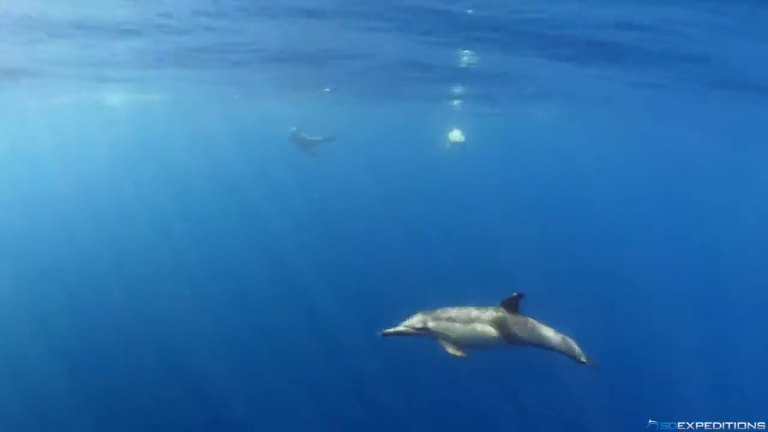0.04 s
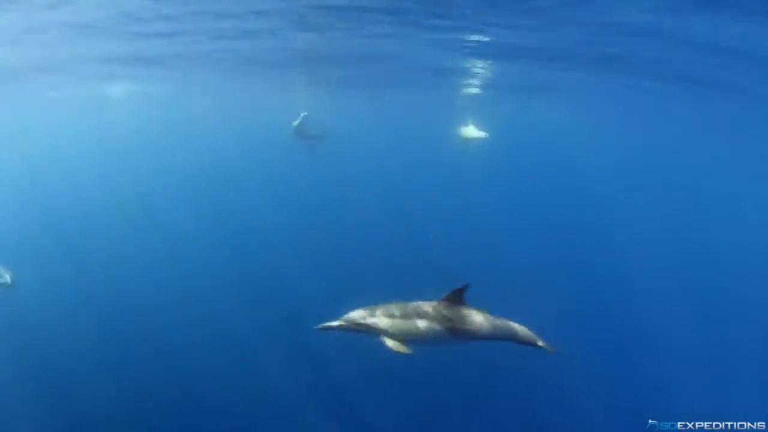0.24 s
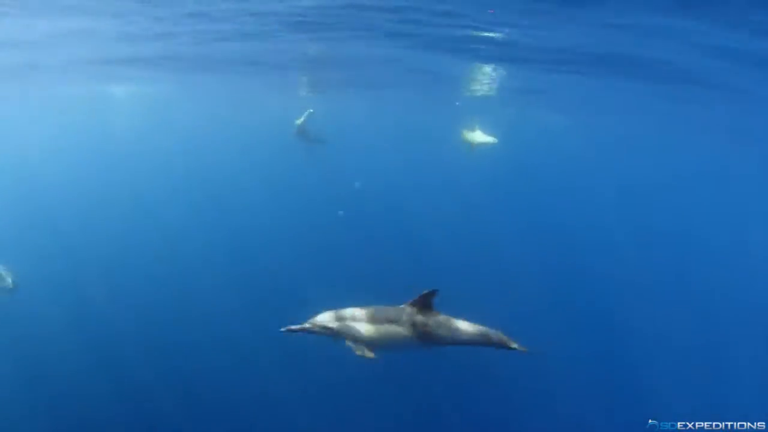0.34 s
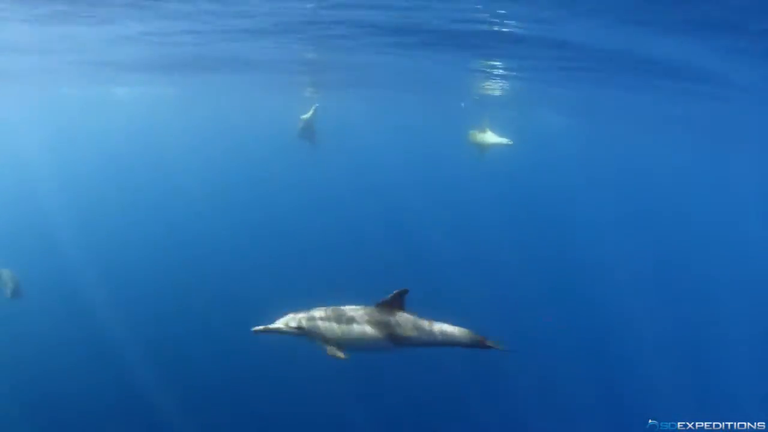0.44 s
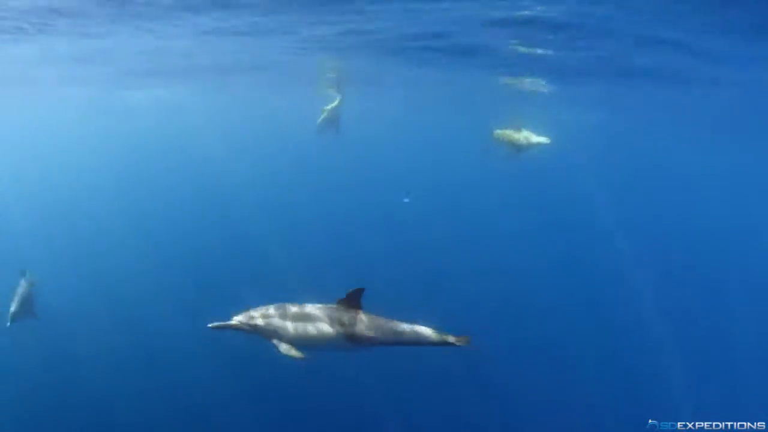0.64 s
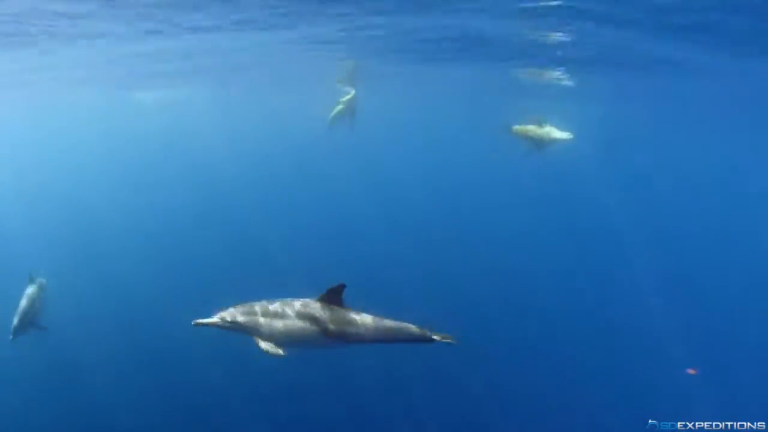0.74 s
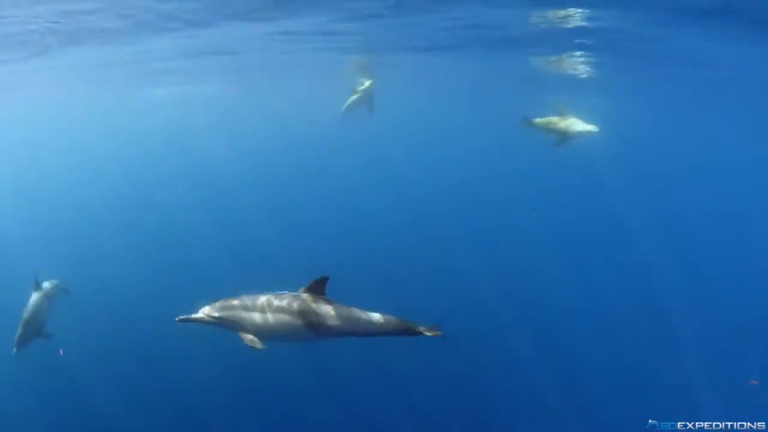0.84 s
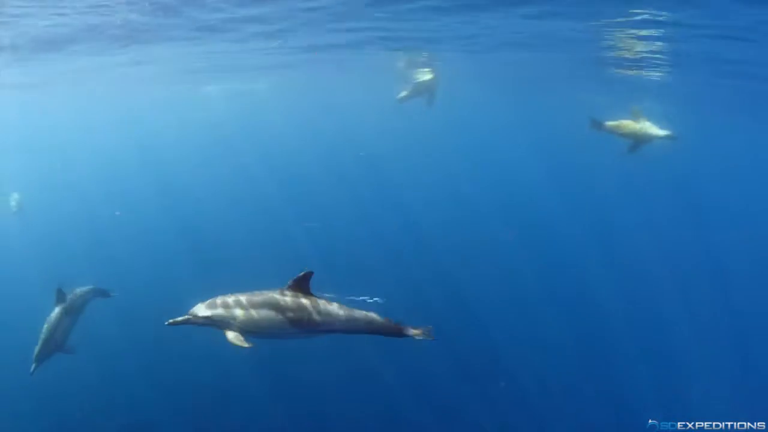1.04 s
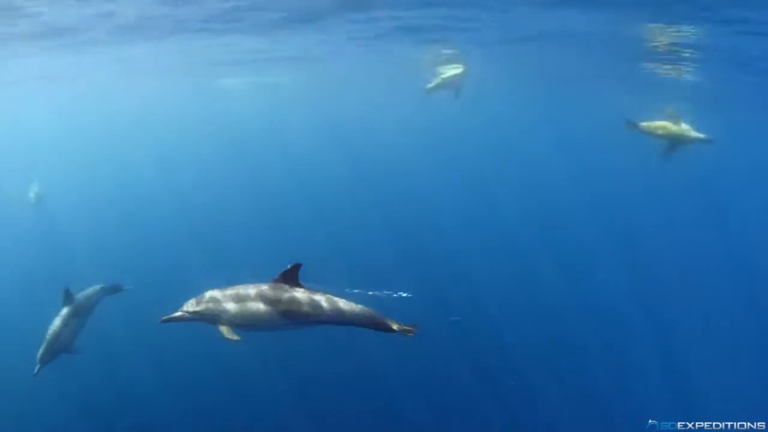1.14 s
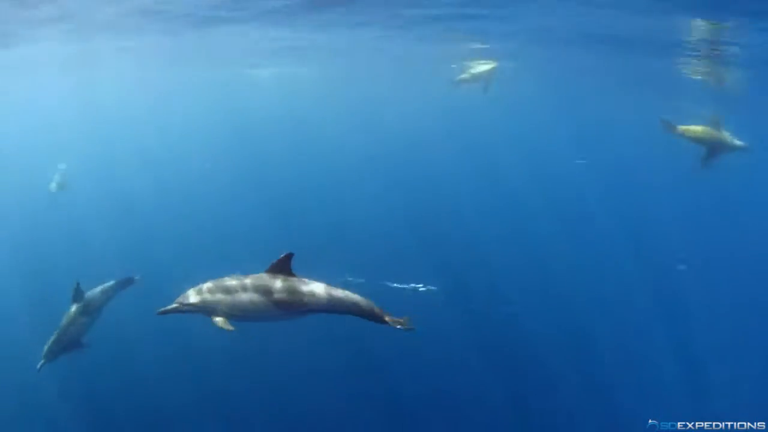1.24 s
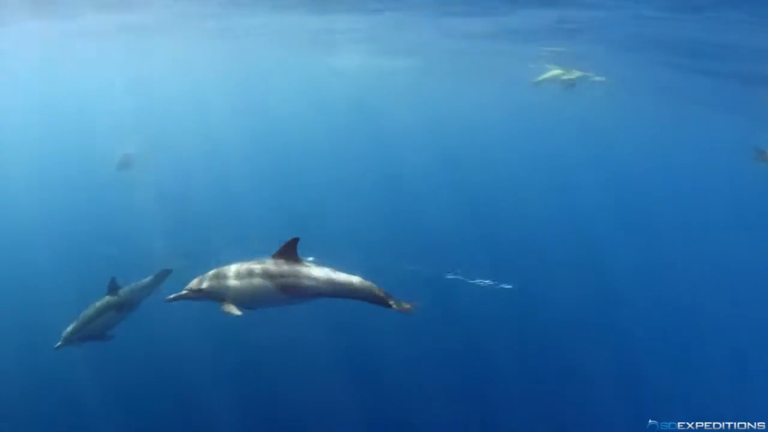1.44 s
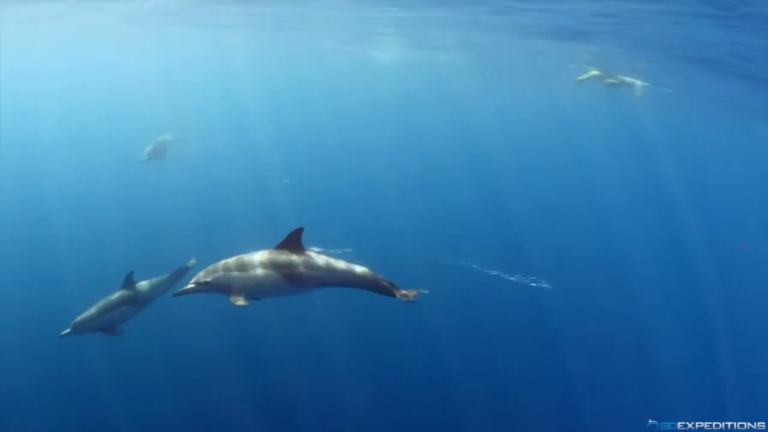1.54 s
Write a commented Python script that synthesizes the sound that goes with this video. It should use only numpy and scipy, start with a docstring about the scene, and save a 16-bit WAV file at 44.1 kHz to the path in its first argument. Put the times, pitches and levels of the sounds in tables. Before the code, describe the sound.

Dolphins click in rapid trains underwater in the open sea. Early on, a gush of bubbles gurgles and fizzes close to the microphone. Two high rising whistles follow, then slower knocking clicks, over steady low sea noise.

```python
"""Bubbles and dolphins in open sea

Underwater, two microphones inside a camera housing, whose air rings with churn and knocks. Close by, a gush of
bubbles gurgles and fizzes; single bubbles ping and small snaps crack. Out in the water two dolphins click in
trains, a nearer one knocks slowly, and two whistles rise, the first led in by a few snaps, smeared by scatter
off the surface. Steady sea noise lies behind it all."""
import sys
import numpy as np
from scipy import signal
from scipy.io import wavfile
from scipy.ndimage import uniform_filter1d

SR = 44100
rng = np.random.default_rng(int(sys.argv[2]) if len(sys.argv) > 2 else 0)


def materialize(psi):
    """Save the field psi as 16-bit PCM at rate SR to the path in sys.argv[1].

    A 1-D psi becomes a single channel; in a 2-D psi each row is a channel.
    """
    bounded = np.clip(np.atleast_2d(psi).T, -1, 1)
    quanta = np.round(bounded * 32767).astype(np.int16)
    wavfile.write(sys.argv[1], SR, quanta)


N = 70560

# Churn of the water close by: time_s, level_db
CHURN_LEVELS = [(0, -72), (.21, -68), (.232, -45), (.3, -47.5), (.43, -54.5), (.55, -54), (.63, -58),
                (.7, -60), (.8, -64), (.95, -66.5), (1.28, -65.5), (1.33, -61), (1.6, -67)]
GURGLE_DB, GURGLE_PER_S = 31, 900
# Air modes of the housing: pitch_hz, width_hz, churn_db, knock_db, stereo_turn_rad
AIR_MODES = [(346.2, 141, -5, -34, 0.11), (412, 97, 0, -1.5, -0.069), (636.7, 102, -12, 0.5, -0.16),
             (682, 107, -19, -4, 0.026), (853, 69, -9.5, -24, 0.78), (1037.4, 53, -20.5, 2.5, -0.39),
             (1416, 42.3, -24.5, 2.5, -0.43), (1780, 106, -53, 6, 1.25), (2040, 42, -58, -1, -0.58),
             (2340, 185, -47, -5, 1.07), (2807, 53, -31.5, -42, -0.53)]
# Big bubbles of the gush: peak_s, level_db, pitch_hz, length_s
BIG_BUBBLES = [(.228, -30.5, 399.6, 0.019), (0.251, -44, 406, 0.015), (0.264, -29.5, 321, 0.018),
               (.281, -23.5, 360.4, 0.023), (0.301, -34, 447, 0.038), (0.341, -28.5, 375, 0.026),
               (0.367, -26, 395.6, 0.0216), (0.396, -34, 382, 0.031), (.422, -33.5, 380, 0.03),
               (0.445, -34, 420, 0.013), (0.455, -32.5, 396, 0.0145), (0.469, -27.5, 394, 0.0158),
               (0.503, -36, 405.4, 0.046), (0.536, -40.5, 421, 0.047), (0.567, -39.5, 420, 0.025),
               (0.607, -41, 389, 0.048), (0.652, -38, 421, 0.055), (0.676, -38.5, 395, 0.021),
               (0.721, -42, 384, 0.028), (0.774, -43, 362, 0.027), (1.332, -41, 383, 0.016),
               (1.414, -45, 402, 0.022)]
GULP_GLIDE, GULP_TURN = 0.13, -0.075  # share of pitch climbed; lean to the right microphone
# Fizz of the gush: time_s, level_db
FIZZ_LEVELS = [(0, -71.5), (0.209, -68.5), (.245, -54.5), (.3, -56.5), (.35, -64), (.46, -65.5), (.56, -73),
               (1.6, -106)]
# Cracks within the fizz: start_s, level_db
FIZZ_CRACKS = [(.2545, -38), (.2735, -41)]
# Resonances of the housing's port: centre_hz, width_hz, gain_db
PORT_MODES = [(3430, 250, -15.5), (5300, 1140, -9.5), (6540, 500, -4.5), (8500, 510, -6), (10800, 660, -1),
              (13300, 3000, -3)]
CRACK_T60_S, FIZZ_PER_S = .012, 9000

# Sonar clicks of two dolphins: start_s, level_db
SONAR_CLICKS = [(0.0084, -53.5), (0.037, -48.5), (0.0545, -44.5), (0.0833, -51), (0.1045, -52),
                (0.1266, -45), (0.15, -53), (0.1715, -51), (0.194, -52.5), (0.2159, -49.5), (0.2375, -52),
                (0.259, -54), (0.282, -48), (0.302, -46), (0.322, -47), (0.3433, -48), (0.3636, -49),
                (0.3842, -50), (0.407, -49), (0.4286, -49), (0.452, -48), (0.4805, -49), (0.517, -49),
                (0.653, -54.5), (0.817, -52), (0.852, -49), (0.8886, -48.5), (0.921, -50), (0.9507, -47),
                (0.9846, -47), (1.0163, -47), (1.046, -46), (1.0748, -50.5), (1.1014, -48), (1.1278, -48),
                (1.1383, -54), (1.1544, -52), (1.181, -45), (1.2093, -44), (1.233, -46), (1.2587, -55),
                (1.284, -45), (1.3116, -44.5), (1.3389, -45), (1.3982, -45.5), (1.4315, -46), (1.4714, -48)]
# Spectrum of a click: frequency_hz, level_db
CLICK_SPECTRUM = [(5000, -32), (8000, -34), (10000, -1.5), (12500, 3), (14500, 0), (16000, 7)]
CLICK_DB, CLICK_RISE_S, CLICK_T60_S = -3.5, 0.00069, 0.01
CLICK_TAIL_DB, CLICK_TAIL_T60_S = -11.5, 0.027
# Slow knocks of the near dolphin: start_s, tick_db, housing_db
NEAR_KNOCKS = [(1.2088, -64, -59), (1.2907, -48, -62.5), (1.3229, -49, -59), (1.3645, -42, -54),
               (1.4116, -44.5, -53.5), (1.4619, -45, -50.5), (1.5245, -45.5, -51.5), (1.5852, -46.5, -51.5)]
# Spectrum of a knock's tick: frequency_hz, level_db
TICK_SPECTRUM = [(4500, -14), (6500, 5.5), (9500, 7), (11500, 15.5), (14000, 6), (16000, 3)]
TICK_DB, TICK_T60_S = -5, 0.024
KNOCK_BODY_DB, KNOCK_BODY_T60_S, KNOCK_WIDEN, KNOCK_BLOW = 13.5, 0.06, 3, 13.9
# Whistle contours, one list each: time_s, pitch_hz, level_db
WHISTLE_CONTOURS = [
    [(.731, 10250, -66.5), (.742, 10600, -60), (.75, 10950, -55), (.76, 11030, -56), (.795, 14200, -46.5),
     (.802, 14300, -60), (.811, 15170, -53), (.818, 15000, -73)],
    [(1.156, 8200, -61), (1.168, 8380, -58), (1.184, 8440, -47.5), (1.198, 8740, -45), (1.228, 9720, -53),
     (1.247, 10070, -55), (1.257, 11300, -54.5), (1.265, 13000, -60), (1.272, 14200, -74)],
]
# Place of each whistle: left_over_right_db
WHISTLE_SIDES = [.5, 3]
# Breathy spread around each whistle: level_db
WHISTLE_BREATH = [-13.5, -24]
WHISTLE_WOBBLE_HZ, WHISTLE_FLUTTER_DB, BREATH_HZ = 153, 2, 1580
SCATTER_DB, SCATTER_T60_S = -0.5, 0.021
# Rasp under each whistle: start_s, length_s, level_db, fade_db
WHISTLE_RASPS = [(0.704, 0.067, -65, -16), (1.136, 0.137, -57.5, -8)]
# Spectrum of a rasp: frequency_hz, level_db
RASP_SPECTRUM = [(1000, 0.5), (3300, -6), (4500, -19), (7500, -9), (9500, -3), (12300, -1.5), (14500, -3),
                 (16000, -12)]
RASP_EDGE_S = 0.0031

# Single bubbles: start_s, level_db, pitch_hz, t60_s
LONE_BUBBLES = [(.09, -47, 678, 0.1), (0.085, -45.5, 364, 0.023), (0.272, -48.5, 98, 0.11),
                (0.264, -43, 182, 0.033), (.506, -47, 206, 0.1), (0.91, -53.5, 1007, 0.1),
                (0.998, -59.5, 2660, 0.053), (1.048, -53, 1464, 0.047), (1.142, -62, 1280, 0.25),
                (1.2075, -47.5, 990, 0.03)]
PING_RISE_CYCLES = 3.12
# Small snaps: start_s, level_db, centre_hz; the two near 0.71 s lead into the first whistle
SMALL_SNAPS = [(0.094, -52.5, 5860), (0.111, -49.5, 6550), (0.108, -49, 11100), (.124, -44, 5680),
               (.706, -58, 6800), (.721, -51.5, 9300), (1.001, -47, 6980), (1.026, -34.5, 10470),
               (1.142, -38, 10840), (1.15, -35, 12400)]
SNAP_T60_S, SNAP_WIDTH, SNAP_RING_DB = 0.018, 0.099, -5.5
# Spectrum of the open sea: frequency_hz, level_db
SEA_SPECTRUM = [(15, -62), (25, -23), (285, -7), (384, -9.5), (516, -39), (659, -2), (775, -19.5),
                (1020, -14.5), (1190, -24.5), (2760, -29.5), (3720, -34.5), (12500, -31), (16000, -47)]
# Likeness of noise at the two microphones: frequency_hz, correlation
MIC_LIKENESS = [(30, 0.79), (80, 0.84), (300, 0.99), (700, -0.29), (2500, -0.54), (5000, 0.2),
                (15000, 0.55)]
SEA_DB, CUTOFF_HZ = -61, 16500


def gurgle():
    """Close by, churning water drives the housing with dense, uneven pops."""
    level = amp(np.interp(np.arange(N) / SR, *np.transpose(CHURN_LEVELS)) + GURGLE_DB)
    return housing(level * pops(GURGLE_PER_S, spread_db=2.5))


def gulps():
    """Big bubbles swell out of the gush, each climbing in pitch as it rings."""
    out = 0
    for s, db, hz, length in BIG_BUBBLES:
        t = np.arange(N) / SR - s
        swell = np.cos(np.pi * np.clip(t / length, -.5, .5))
        phase = 2 * np.pi * hz * t * (1 + GULP_GLIDE * t / length / 2)
        out = out + amp(db) * swell * np.sin(phase)
    return out * (1 + GULP_TURN * np.array([[1], [-1]]))


def fizz():
    """Tiny pops, loudest at the gush and bunched into cracks, ring in the port."""
    level = amp(np.interp(np.arange(N) / SR, *np.transpose(FIZZ_LEVELS)))
    level += dying(*np.transpose(FIZZ_CRACKS), CRACK_T60_S)
    shared, *each_mic = [pops(FIZZ_PER_S, spread_db=5.0) for _ in range(3)]
    spit = level * (shared + 0.58 * np.array(each_mic))
    return sum(amp(db) * np.sqrt(SR / width / 20) * bandpass(spit, hz - width / 2, hz + width / 2)
               for hz, width, db in PORT_MODES)


def clicks():
    """Dolphin sonar: each click is a bright burst with a quick rise and a faint scattered tail."""
    s, db = np.transpose(SONAR_CLICKS)
    burst = dying(s, db + CLICK_DB, CLICK_T60_S)
    tail = dying(s, db + CLICK_DB + CLICK_TAIL_DB, CLICK_TAIL_T60_S)
    pole = np.exp(-1 / (CLICK_RISE_S * SR))
    return signal.lfilter([1 - pole], [1, -pole], burst + tail) * noise(CLICK_SPECTRUM)


def knocks():
    """The near dolphin's broader clicks shake the housing: one blow, then a short rattle."""
    s, tick_db, body_db = np.transpose(NEAR_KNOCKS)
    drive = rng.standard_normal(N)
    drive[(s * SR).astype(int)] = KNOCK_BLOW
    shake = dying(s, body_db + KNOCK_BODY_DB, KNOCK_BODY_T60_S) * drive
    tick = dying(s, tick_db + TICK_DB, TICK_T60_S) * noise(TICK_SPECTRUM)
    return tick + housing(shake, knocked=True)


def whistles():
    """Dolphin whistles glide up and waver, smeared by scatter off the rippled surface."""
    direct, t = 0, np.arange(N) / SR
    for contour, side_db, breath_db in zip(WHISTLE_CONTOURS, WHISTLE_SIDES, WHISTLE_BREATH):
        s, hz, db = np.transpose(contour)
        pitch_hz = np.interp(t, s, hz) + WHISTLE_WOBBLE_HZ * drift(155)
        level_db = np.interp(t, s, db, -200, -200) + WHISTLE_FLUTTER_DB * drift(160)
        tone = np.sqrt(2) * amp(level_db) * np.sin(2 * np.pi * np.cumsum(pitch_hz) / SR)
        breath = 1 + amp(breath_db) * drift(BREATH_HZ)
        direct = direct + tone * breath * amp([[side_db / 2], [-side_db / 2]])
    tail = rng.standard_normal((3, SR // 10)) * amp(-60 * t[:SR // 10] / SCATTER_T60_S)
    tail = tail[0] + 2.2 * tail[1:]  # a shared part, plus one for each microphone
    tail /= np.sqrt(np.sum(tail ** 2) / 2)
    return direct + amp(SCATTER_DB) * signal.fftconvolve(direct, tail, axes=1)[:, :N]


def rasps():
    """A grainy rasp fades under each whistle."""
    level, t = 0, np.arange(N) / SR
    for s, length, db, fade_db in WHISTLE_RASPS:
        gate = np.clip(np.minimum(t - s, s + length - t) / RASP_EDGE_S, 0, 1)
        level = level + gate * amp(db + fade_db * (t - s) / length)
    return level * noise(RASP_SPECTRUM, flicker_db=3.0)


def ping(s, db, hz, t60):
    """A lone bubble rings on its own pitch: a sine that swells and dies."""
    t = np.maximum(np.arange(N) / SR - s, 0)
    rise_s = PING_RISE_CYCLES / hz
    swell = np.sin(np.pi / 2 * np.minimum(t / rise_s, 1)) ** 2
    decay = amp(-60 * np.maximum(t - rise_s, 0) / t60)
    return amp(db) * swell * decay * np.sin(2 * np.pi * hz * t)


def snaps():
    """Each small snap is a short ring inside a narrow crack of noise."""
    out, white = 0, rng.standard_normal(N) + 1.4 * rng.standard_normal((2, N))
    for s, db, hz in SMALL_SNAPS:
        hiss = rms_one(bandpass(white, hz * (1 - SNAP_WIDTH), hz * (1 + SNAP_WIDTH)))
        level = uniform_filter1d(dying([s], db - 8.5, SNAP_T60_S), size=40)
        out = out + level * hiss + ping(s, db + SNAP_RING_DB, hz, SNAP_T60_S)
    return out


def housing(drive, knocked=False):
    """The housing's air rings in steep modes; each has its own gain and sign at each microphone."""
    out = 0
    for k, (hz, width, churn_db, knock_db, turn) in enumerate(AIR_MODES):
        r = np.exp(-np.pi * width * (KNOCK_WIDEN if knocked else 1) / SR)
        resonator = [(1 - r * r) / 2, 0, (r * r - 1) / 2, 1, -2 * r * np.cos(2 * np.pi * hz / SR), r * r]
        mode = amp(knock_db if knocked else churn_db) * signal.sosfilt([resonator, resonator], drive)
        mic_gains = np.cos(turn) + np.sin(turn) * np.array([[1], [-1]])
        out = out + (-1) ** k * mode * mic_gains
    return out


def sea():
    """The open sea all around: a steady, low wash."""
    return amp(SEA_DB) * noise(SEA_SPECTRUM)


def noise(spectrum, flicker_db=0):
    """Third-octave bands of stereo noise, each with its own level, flicker and likeness; rms 1."""
    def at(table, hz):
        table_hz, values = np.transpose(table)
        return np.interp(np.log(hz), np.log(table_hz), values)

    bottom, top = spectrum[0][0], spectrum[-1][0]
    edges = np.geomspace(bottom, top, 2 + int(3 * np.log2(top / bottom)))
    out, white = 0, rng.standard_normal((2, 2, N + SR // 8))
    for k, (low, high) in enumerate(zip(edges, edges[1:])):
        centre_hz = np.sqrt(low * high)
        mid, side = bandpass(white[k % 2], low, high)[:, -N:]
        alike = np.clip(at(MIC_LIKENESS, centre_hz), -1, 1)
        gain = amp(at(spectrum, centre_hz) + (flicker_db * drift(120) if flicker_db else 0))
        out = out + gain * (np.sqrt(1 + alike) * mid + np.sqrt(1 - alike) * side * [[1], [-1]])
    return rms_one(out)


def pops(per_s, spread_db):
    """Random impulses of uneven size; rms 1."""
    hits = rng.random(N) < per_s / SR
    sizes = amp(spread_db * np.minimum(rng.exponential(1, N), 4))
    return rms_one(hits * sizes * rng.choice([-1, 1], N))


def drift(rate_hz):
    """A smooth random wander; rms 1."""
    r = np.exp(-2 * np.pi * rate_hz / SR)
    return rms_one(signal.lfilter([1], [1, -2 * r, r * r], rng.standard_normal(N + SR // 2))[SR // 2:])


def dying(s, db, t60):
    """An envelope that jumps at each time and dies away."""
    marks = np.zeros(N)
    marks[(np.asarray(s) * SR).astype(int)] = amp(db)
    return signal.lfilter([1], [1, -amp(-60 / (t60 * SR))], marks + 1e-18)


def bandpass(x, low_hz, high_hz):
    return signal.sosfilt(signal.butter(2, [low_hz, high_hz], "band", fs=SR, output="sos"), x)


def amp(db):
    return 10 ** (np.asarray(db) / 20)


def rms_one(x):
    return x / np.sqrt(np.mean(x ** 2) + 1e-20)


def scene():
    """From inside the housing: sea noise under close bubbles and the dolphins."""
    water = sea() + gurgle() + gulps() + fizz() + snaps()
    pings = sum(ping(*bubble) for bubble in LONE_BUBBLES)
    dolphins = clicks() + knocks() + whistles() + rasps()
    return water + pings + dolphins


def record(dry):
    """The camera cuts the highest treble steeply."""
    return signal.sosfilt(signal.cheby2(10, 50, CUTOFF_HZ, fs=SR, output="sos"), dry)


dry = scene()
out = record(dry)
materialize(out)
```